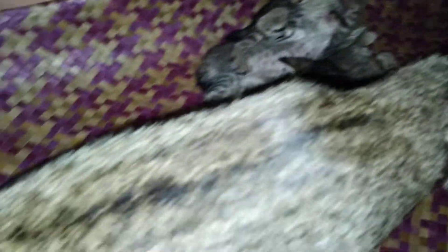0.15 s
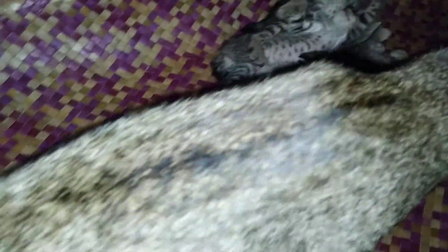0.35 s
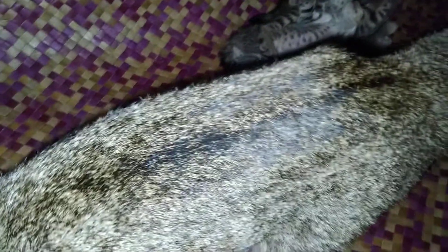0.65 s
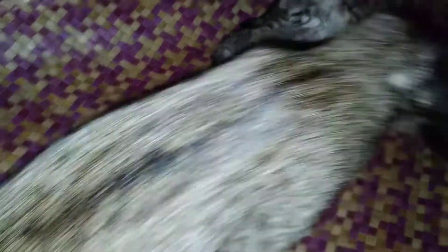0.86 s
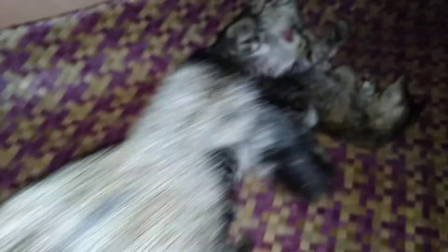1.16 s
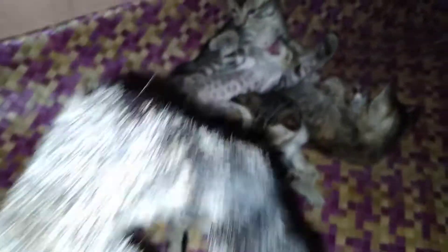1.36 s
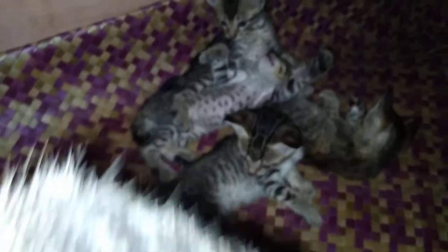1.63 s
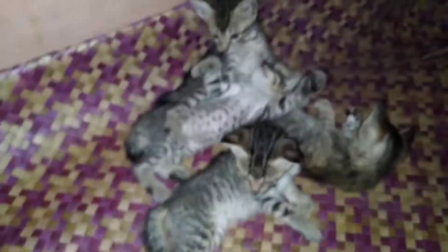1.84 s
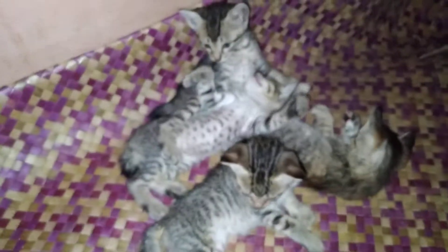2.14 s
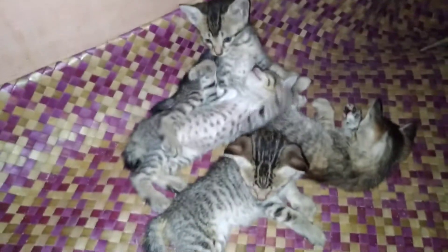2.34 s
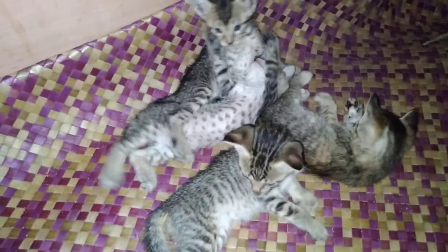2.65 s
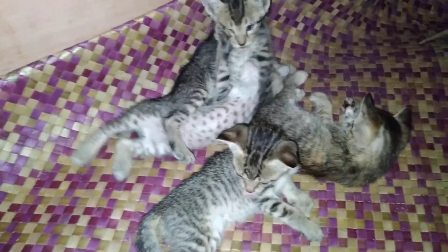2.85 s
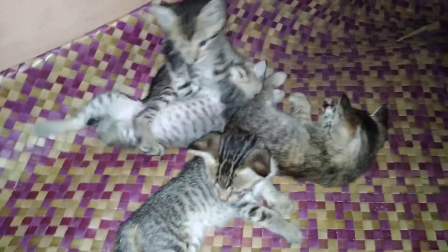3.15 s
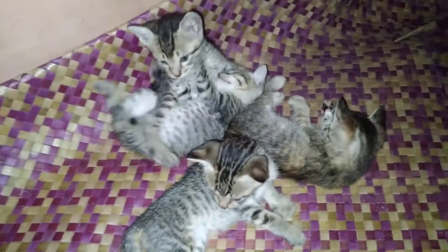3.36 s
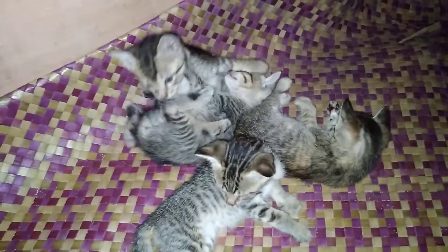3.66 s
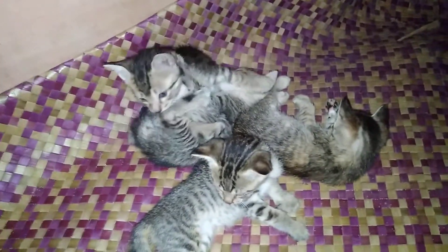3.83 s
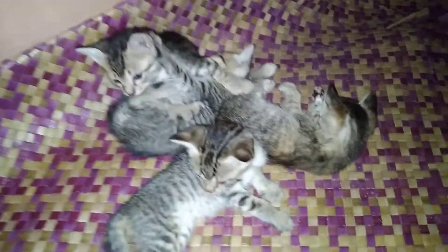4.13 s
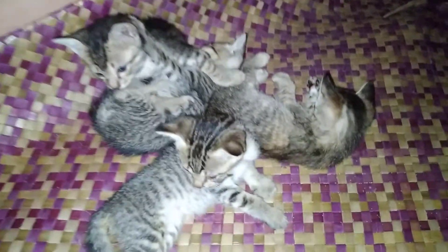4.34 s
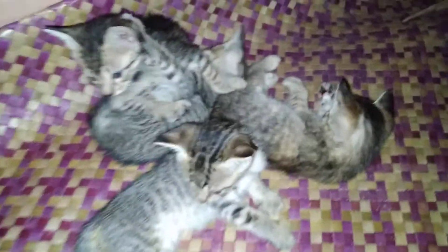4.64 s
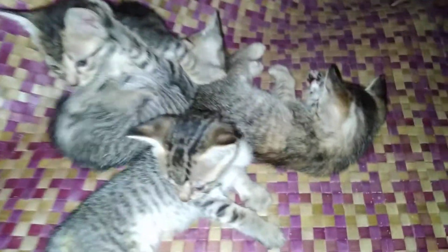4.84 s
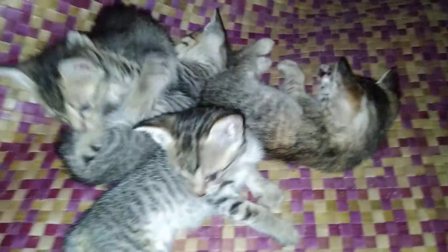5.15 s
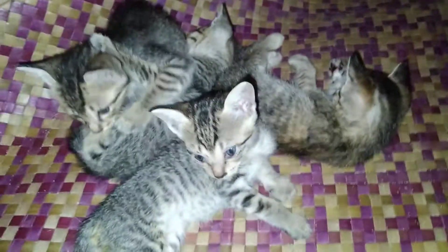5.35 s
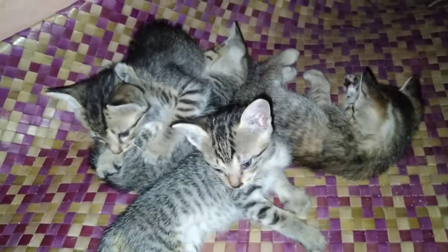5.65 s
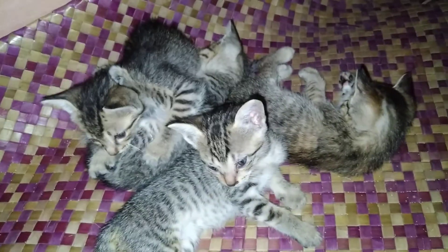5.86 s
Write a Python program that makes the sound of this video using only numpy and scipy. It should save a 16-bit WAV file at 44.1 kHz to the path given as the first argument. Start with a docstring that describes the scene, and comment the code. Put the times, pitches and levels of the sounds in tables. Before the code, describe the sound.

Kittens rustle and pat on a woven mat; a phone buzzes twice, a hoarse rooster-like crow sounds farther off, then sharp knocks hit the microphone.

```python
"""Kittens on a woven mat

Kittens tumble in a small room: enveloped noise makes swishes and fur rubs, damped sines make soft bumps,
and short pulses make claw ticks and knocks at the microphone. A phone's vibration motor spins up and
coasts down twice, a modelled shaft turning in a rough bearing. Short noise rasps come at a near even pace.
Further off, harmonics and chopped noise give a hoarse four-note call, like a rooster's crow, that clears
as it falls."""
import sys
import numpy as np
from scipy import signal
from scipy.fft import rfft, irfft
from scipy.io import wavfile
from scipy.ndimage import uniform_filter1d, map_coordinates

SR = 44100
rng = np.random.default_rng(int(sys.argv[2]) if len(sys.argv) > 2 else 0)


def log_audio(samples):
    """Write samples as a 16-bit WAV file to the path given in sys.argv[1]."""
    # one column per channel
    frames = np.atleast_2d(samples).T
    # limit to full scale, then quantise
    limited = np.clip(frames, -1, 1)
    pcm = np.round(limited * 32767).astype(np.int16)
    wavfile.write(sys.argv[1], SR, pcm)


N = 264143
T = np.arange(N) / SR  # time in seconds


def swishes(grain_db=0.9, catch_db=3):
    """Sliding friction: each slide or claw drag over the weave is a swell of finely uneven noise."""
    # Paws and bodies sliding. Each row: start in seconds, level in dB, length in seconds.
    slide_rows = [(0, -42, .029), (.03, -46.5, 0.085), (.161, -49.5, 0.066), (.298, -48.5, 0.062),
                  (.352, -55, 0.077), (.666, -43.5, 0.11), (.768, -58.5, 0.052), (.938, -61.5, 0.05),
                  (1.018, -45.5, 0.061), (2.576, -58, 0.086), (2.7, -46.5, 0.23), (2.876, -59, .2),
                  (3.095, -59, .02), (3.485, -52, .095), (3.772, -59.5, 0.092), (4.085, -53, 0.046),
                  (4.465, -63.5, 0.058), (4.493, -56, 0.069), (5.105, -61.5, 0.067), (5.135, -54, 0.043),
                  (5.273, -49, 0.19), (5.478, -43.5, .076), (5.555, -43.5, 0.087), (5.657, -48, 0.06),
                  (5.925, -53, .035)]
    # Spectrum of the slides. Each row: frequency in Hz, relative level in dB.
    slide_colour = [(1180, -23.5), (2000, -17), (2380, -24), (2960, -21.5), (3770, -19), (4490, -22),
                    (6590, -9.5), (7120, -12.5), (8480, 0.5), (9330, 0), (12400, -18), (16000, -23.5)]
    # Claws dragged across the strands. Each row: start in seconds, level in dB, length in seconds.
    scrape_rows = [(.77, -57, 0.053), (.93, -59.5, 0.12), (5.285, -48.5, 0.074), (5.46, -51, 0.096),
                   (5.555, -58.5, 0.086), (5.655, -52, 0.074)]
    # Spectrum of the claw drags. Each row: frequency in Hz, relative level in dB.
    scrape_colour = [(600, -18.5), (1600, -18), (2150, -1.5), (2700, -4), (3200, -3.5), (4000, -13.5),
                     (6000, -9.5), (9000, -7.5), (14000, -38.5)]
    slide_gain = strokes(slide_rows) * amp(grain_db * wander(500))
    slides = colour(noise(same=0.23) * slide_gain, slide_colour)
    claw_gain = strokes(scrape_rows) * amp(catch_db * wander(300))
    claws = colour(noise(same=0.34) * claw_gain, scrape_colour)
    return room(slides + claws * pan(3.0), wet_db=-5.0)


def bodies():
    """Broadband rubbing and low-frequency shaking: fur brushes by the phone, rolling bodies shake the floor."""
    # Fur brushing past the phone. Each row: start in seconds, level in dB, length in seconds.
    fur_rows = [(.66, -75, 0.13), (.81, -59, 0.14), (.93, -65, 0.51), (1.03, -53.5, 0.048),
                (1.085, -48, 0.073), (5.325, -41, 0.08), (5.39, -58, 0.13), (5.52, -65, 0.25),
                (5.65, -65.5, 0.2), (5.82, -70.5, 0.22)]
    # Spectrum of the fur. Each row: frequency in Hz, relative level in dB.
    fur_colour = [(100, -18), (300, -1.5), (560, -4.5), (900, -6), (1300, -3.5), (2300, -14.5),
                  (3400, -11.5), (4500, -21), (9000, -18.5), (14000, -40)]
    # Bodies rolling on the floor. Each row: start in seconds, level in dB, length in seconds.
    tumble_rows = [(.39, -65, 0.13), (1.015, -44.5, .075), (1.09, -59, 0.14), (2.33, -56.5, 0.4),
                   (2.6, -55, 0.077), (2.94, -55, 0.14), (3.12, -56.5, 0.36), (3.37, -50, 0.16),
                   (4.11, -61.5, 0.1), (4.78, -55, 0.25), (4.96, -77, .07), (5.32, -60, 0.12),
                   (5.76, -60, .13)]
    # Spectrum of the shaking floor. Each row: frequency in Hz, relative level in dB.
    tumble_colour = [(20, -37.5), (36, -9.5), (52, 3), (100, -0.5), (135, -11.5), (190, -7.5), (280, -29),
                     (600, -48)]
    # restless stirring lies under the rolls: level, unevenness and pace
    stir_db, stir_swing_db, stir_hz = -71, 4, 3.3
    fur_gain = strokes(fur_rows) * amp(2 * wander(55))
    fur = colour(noise(same=0.39) * fur_gain, fur_colour) * pan(4.2)
    shaking = strokes(tumble_rows) + amp(stir_db + stir_swing_db * wander(stir_hz))
    floor = colour(noise(same=0.97), tumble_colour) * shaking
    return ports(fur + floor)


def pats():
    """Damped oscillation: the mat gives a few swings under each paw, and toes tap faintly at random."""
    # Paws patting, dull with the pad and brighter with the toes.
    # Each row: start in seconds, envelope peak in dB, swing frequency in Hz.
    pat_rows = [(0.525, -53.5, 291), (.593, -54, 1340), (.633, -49.5, 1490), (.674, -52.5, 288),
                (.748, -54.5, 595), (.826, -47, 630), (1.055, -50.5, 202), (1.106, -48, 510),
                (2.334, -38, 95.5), (2.419, -42.5, 89.4), (3.9, -41.5, 1280), (3.921, -62, 1290),
                (3.95, -55, 1564), (4.169, -53, 610), (4.476, -51.5, 1650), (4.531, -60, 1540),
                (4.653, -56, 1810), (4.682, -57, 1720), (4.796, -43, 119.2), (4.889, -54, 116),
                (5.112, -48, 1590), (5.414, -54, 473), (5.484, -51, 640), (5.562, -52.5, 337),
                (5.668, -48, 635), (5.846, -48.5, 660), (5.86, -48, 193), (5.947, -47.5, 285)]
    peak_swings = 1.19  # swings of the mat up to the peak of a pat
    toes_per_s, toe_db, toe_hz, toe_spread_db = 9.2, -62, 1642, -2
    toes = []
    for s in T[rng.random(N) < toes_per_s / SR]:
        level = toe_db + toe_spread_db * rng.standard_normal()
        toes.append((s, level, toe_hz * rng.uniform(0.52, 1.15)))
    out = np.zeros(N)
    for s, db, hz in list(pat_rows) + toes:
        part = out[round(s * SR):][:SR // 4]  # a view: adding to it adds to out
        swings = hz * T[:len(part)]
        envelope = swings / peak_swings * np.exp(1 - swings / peak_swings)
        part += amp(db) * envelope * np.sin(2 * np.pi * swings)
    return room(out * pan(0), wet_db=-1.5)


def knocks():
    """Pressure pulse: a push and a pull at the nearer port; a slower push is also rounder."""
    # Knocks right at a microphone port.
    # Each row: time in seconds, level in dB, width in seconds, left minus right in dB.
    knock_rows = [(4.1682, -31, 0.00025, -31), (4.8821, -7.5, 0.000025, 55), (5.341, -5, 0.00016, 45),
                  (5.3621, -14, 0.00025, 43), (5.3639, -12.5, 0.000084, 41), (5.3668, -17, 0.00015, 34)]
    out = np.zeros((2, N))
    for s, db, width, side_db in knock_rows:
        u = (T - s) / width
        sides = pan(side_db) / pan(abs(side_db))[0]  # the louder port has gain 1
        out += amp(db) * sides * -u * np.exp(1 - np.hypot(u, .4))
    return out


def ticks():
    """Elastic release: a strand caught by a claw snaps back with a very short decaying crackle."""
    # Claws catching on strands.
    # Each row: time in seconds, level in dB, decay time in seconds, left minus right in dB.
    tick_rows = [(2.8323, -30.5, 0.0012, -10), (4.092, -47.5, 0.00058, -6), (4.3084, -52.5, 0.00075, 13),
                 (4.8766, -32, 0.0007, -3.5), (4.8837, -20.5, 0.00017, -10), (4.8862, -17, 0.00036, -1),
                 (5.3401, -17.5, 0.00053, 13.5), (5.3582, -41, .0007, 8), (5.3592, -34.5, 0.0074, 19),
                 (5.374, -31, 0.00055, 17), (5.5468, -31, 0.00033, 9), (5.6134, -21.5, 0.0007, 4.5)]
    # Spectrum of the crackle. Each row: frequency in Hz, relative level in dB.
    tick_colour = [(300, -6.5), (1000, -8.5), (3500, -10), (5500, -7.5), (7300, -1), (8800, 6), (10500, 0),
                   (13000, -10), (16000, -10.5)]
    gain = np.zeros((2, N))
    for s, db, decay, side_db in tick_rows:
        gain += amp(db) * pan(side_db) * (T >= s) * np.exp(-abs(T - s) / decay)
    return room(colour(np.sign(noise()) * gain, tick_colour), wet_db=-13.5)


def motor(hiss_db=-10, repeat_driven=1.0, repeat_coasting=0.52, hum_db=-4, port_lag=2.56, rib_db=3.0):
    """Rotating imbalance: an off-centre weight hums; its shaft scrapes the bearing, mostly in the left port."""
    # Hum of the weight. Each row: shaft speed in Hz, relative level in dB.
    hum_levels = [(30, -80), (75, -51), (100, -40.5), (125, -34), (165, -33), (240, -31)]
    # Bumps felt in each turn. Each row: multiple of the shaft speed, relative level in dB.
    bump_levels = [(2, -10), (3, 5), (4, 7), (5, 9.5), (6, -11), (8, 2.5), (10, -8), (12, 7), (13, -2),
                   (18, -8), (19, -6.5), (24, 4.5), (29, -9), (38, 1), (52, -4.5), (64, -3.5), (79, -0.5)]
    # Spectrum of the rattle. Each row: frequency in Hz, relative level in dB.
    rattle_colour = [(300, -40.5), (700, -47), (1200, -19.5), (3300, -17.5), (5500, -10.5), (7300, -15.5),
                     (8100, -8), (8800, 1.5), (9500, -6), (10400, -18), (12800, -28), (15500, -22)]
    speed, driven, force = shaft()
    turns = np.cumsum(speed * (1 + 0.0011 * wander(66))) / SR
    # the case rocks, so its two ends move almost in opposition (port_lag in radians)
    swing = np.sqrt(2) * np.sin(2 * np.pi * turns - [[0], [port_lag]])
    hum = swing * amp(read(hum_levels, speed) + wander(96)) * (speed > 0)
    # the bearing's roughness lies along the angle, so its whole pattern glides with the speed
    steps, laps = 512, 256  # points in a turn, turns in the pattern
    order = np.arange(steps * laps // 2 + 1) / laps
    phases = np.exp(2j * np.pi * rng.random(len(order)))
    bumps = amp(read(bump_levels, order)) * (order > 1) * (order < 80) * phases
    # some multiples stand out from their neighbours as fine ribs
    bumps *= amp(rib_db * rng.standard_normal(steps)[np.round(order).astype(int)])
    place = turns * steps % (steps * laps)
    exact = map_coordinates(unit(irfft(bumps * (order % 1 == 0))), [place], order=1)
    loose = map_coordinates(unit(irfft(bumps)), [place], order=1)
    # a fast, driven shaft repeats each turn; a slow or coasting one plays loosely in its bearing
    pace = speed / speed.max()
    repeat = np.clip(np.sqrt(pace) * np.where(driven > 0, repeat_driven, repeat_coasting), 0, 1)
    scrape = (np.sqrt(repeat) * exact + np.sqrt(1 - repeat) * loose) * pace
    # the brushes add a bright hiss; at speed the weight presses the shaft home once a turn
    hiss = amp(hiss_db) * np.diff(noise(), prepend=0)
    press = 1 + .5 * pace ** 2 * np.cos(2 * np.pi * turns)
    rattle = colour((scrape + hiss) * press, rattle_colour)
    # an even local power leaves the level to the shaft's force
    rattle /= np.sqrt(uniform_filter1d(rattle ** 2, size=1500) + 1e-9)
    return hum * pan(7.7) * amp(hum_db) + rattle * force * pan(25.23)


def shaft(spin_up=.111, coast=.17, friction_hz=40):
    """Rotational inertia: speed, power and rattle gain as power spins the shaft up and friction stops it."""
    # Each row: power on in seconds, power off in seconds, free-running speed in Hz,
    # relative rattle level in dB at the greatest speed reached.
    buzz_rows = [(1.218, 1.463, 260.7, -36.5), (1.713, 1.962, 267.4, -35.5)]
    brush_db, brush_rise_s = -42.5, .018  # the brushes chatter while they pull the shaft up to speed
    speed, driven, power = np.zeros((3, N))
    for on, off, top_hz, db in buzz_rows:
        rise = top_hz * (1 - np.exp(-np.clip(T - on, 0, off - on) / spin_up))
        slowing = np.exp(-np.maximum(T - off, 0) / coast)
        hz = np.maximum((rise + friction_hz) * slowing - friction_hz, 0)
        pace = hz / hz.max()
        powered = gate(on - brush_rise_s / 2, off - on, brush_rise_s, brush_rise_s) ** 2
        power += (amp(db) * pace) ** 2 + (amp(brush_db) * powered * (1 - pace)) ** 2
        speed, driven = np.maximum(speed, hz), driven + powered
    return speed, driven, np.sqrt(power)


def call(jitter=0.0248, rasp_hz=110, air=0.65, clean_db=-1, rough_db=1, flutter_hz=170, bright=0.41):
    """Source and filter: a high voice breaks into a rasp when the folds beat irregularly."""
    # Resonances of the animal's throat. Each row: frequency in Hz, relative level in dB.
    throat = [(250, -46.5), (560, -41.5), (690, -5), (820, 10.5), (910, -6.5), (1100, 0), (1450, 3),
              (1750, 1.5), (1920, 5.5), (2120, -3.5), (2350, 4), (2700, -4), (2950, -18.5), (3200, -11.5),
              (3500, -12), (3780, -14), (4400, -26), (6200, -25.5), (8000, -34.5)]
    # The second note cracks to about the octave below.
    # Each row: start in seconds, length in seconds, pitch in Hz, relative level in dB.
    crack_rows = [(2.541, 0.025, 425.3, -43)]
    effort, pitch, rough = phrase()
    angle = 2 * np.pi * np.cumsum(pitch * (1 + jitter * rough ** 2 * wander(102))) / SR
    clean = sum(np.cos(k * angle) / k ** 1.2 for k in range(1, 8)) * amp(1.74 * wander(25))
    rasp = sum(np.cos(k * angle) * wander(rasp_hz) for k in range(1, 5))
    # loose tissue chops the rasp into uneven pulses
    chop = 1 + .6 * np.cos(2 * np.pi * np.cumsum(flutter_hz * (1 + .3 * wander(40))) / SR)
    breath = colour(rng.standard_normal(N) * chop, throat)
    rasp = unit(colour(rasp * chop, throat)) + air * breath
    # the hardest push sharpens the sound
    curve = np.diff(np.diff(rasp, prepend=0), prepend=0)
    rasp = rasp - bright * (effort / effort.max()) ** 2 * curve
    tone = amp(clean_db) * np.sqrt(1 - rough) * unit(colour(clean, throat)) * pan(1.2)
    voice = tone + amp(rough_db) * rough * unit(rasp)
    crack = np.zeros(N)
    for s, length, hz, db in crack_rows:
        crack += strokes([(s, db, length)]) * np.sin(2 * np.pi * hz * T + 0.52 * wander(60))
    return room((voice * effort + crack) * pan(1.85), wet_db=1)


def phrase(waver_db=-0.17):
    """Breath control: effort, pitch and roughness as notes scoop up, sag and droop and the voice clears."""
    # Notes of the call. Each row: start in seconds, length in seconds, relative level in dB, change over
    # the note in dB, top pitch in Hz before any clearing, time to the top in seconds,
    # first roughness (0-1), last roughness (0-1).
    note_rows = [(2.297, .19, -40.5, -9, 854.8, 0.2, 0.58, 0.8),
                 (2.543, .1, -36.5, 2, 1010, 0.047, 0.19, 0.55),
                 (2.651, 0.43, -36, -5, 1035, .1, 0.93, 0.76),
                 (3.242, .645, -39, -8, 973.5, 0.15, 0.89, 0.4)]
    # The rasp gives way to a clearer tone. Each row: start in seconds, length in seconds,
    # level change in dB, pitch change in Hz, roughness reached (0-1).
    clearing_rows = [(2.562, .06, 3.5, 0.5, 0.21), (3.405, .18, 1, 0, 0.47), (3.575, .255, -1, -22, 0.07)]
    attack_share, release_s = 0.16, 0.076  # a note swells over this share of its length, closes quickly
    scoop, sag_hz_per_s = .14, 190  # pitch starts this share below its top, then sags as the air runs out
    droop_hz, droop_s = 121.55, .12  # and droops as the note closes
    glide_s = .025  # time a clearing takes to come or go
    catch_db, catch_s = 5.5, 0.066  # a last hoarse push as the call ends
    effort, pitch, rough = np.zeros((3, N))
    for start, length, db, fade_db, top_hz, top_s, first, last in note_rows:
        age = np.clip(T - start, 0, length)
        effort += amp(db + fade_db * age / length) * gate(start, length, attack_share * length, release_s)
        hz = top_hz * (1 - scoop * np.maximum(1 - age / top_s, 0))
        hz -= sag_hz_per_s * np.maximum(age - top_s, 0)
        hz -= droop_hz * np.maximum(1 - (length - age) / droop_s, 0) ** 2
        sounding = (T >= start) | (pitch == 0)
        pitch = np.where(sounding, hz, pitch)
        rough = np.where(sounding, first + (last - first) * age / length, rough)
    for start, length, db, hz, left in clearing_rows:
        clear = gate(start, length, glide_s, glide_s)
        effort = effort * amp(db * clear)
        pitch = pitch + hz * clear
        rough = rough + (left - rough) * clear
    end = note_rows[-1][0] + note_rows[-1][1]
    catch = gate(end - catch_s, 2 * catch_s, glide_s, release_s)
    return effort * amp(catch_db * catch + waver_db * wander(22)), pitch, np.clip(rough, 0, 1)


def rasps(rise=0.015):
    """Exponential decay: short harsh noise bursts ring briefly in the room."""
    # Each row: start in seconds, relative level in dB, decay time in seconds.
    rasp_rows = [(0.458, -34.5, 0.0097), (1.01, -32.5, 0.016), (1.557, -29.5, 0.011), (2.107, -30, 0.013),
                 (2.725, -31.5, 0.0059)]
    # Spectrum of the bursts. Each row: frequency in Hz, relative level in dB.
    rasp_colour = [(350, -43), (620, -17.5), (780, -4), (1300, -4), (1900, 0.5), (2700, 2), (3500, -3.5),
                   (5500, -14.5), (8800, -11.5), (11000, -35.5), (16000, -53)]
    gain = np.zeros(N)
    for s, db, decay in rasp_rows:
        fall = np.exp(-np.maximum(T - s - 2 * rise, 0) / decay)
        gain += amp(db) * np.clip((T - s) / rise, 0, 1) * fall
    bursts = colour(noise(same=0.74) * gain * amp(1.4 * wander(250)), rasp_colour)
    return room(bursts * pan(1.1) * amp(-5.5), wet_db=-2.5)


def hush():
    """Stationary noise: the steady hush of the room, partly shared by the two ports."""
    # Spectrum of the hush. Each row: frequency in Hz, relative level in dB.
    hush_colour = [(25, -17), (82, -1.5), (134, -4), (185, -3), (354, -12), (607, -13.5), (1000, -27.5),
                   (1700, -27.5), (2500, -34.5), (4600, -38), (7300, -28.5), (9000, -15.5), (11300, -36),
                   (16000, -29.5)]
    return amp(-69.5) * colour(noise(same=0.57), hush_colour)


def room(x, wet_db):
    """Reverberation: adds sparse reflections, each band dying at its own speed."""
    # Each row: frequency in Hz, time to fall by 60 dB in seconds.
    decay_times = [(150, 0.58), (1000, 0.14), (3000, 0.21), (9000, 0.29), (16000, 0.41)]
    taps = rng.standard_normal((2, SR // 2)) * (rng.random((2, SR // 2)) < .1)
    hz, t, z = signal.stft(taps, SR, nperseg=256)
    fall = amp(-60 * t / read(decay_times, hz)[:, None])
    tail = signal.istft(z * fall, SR, nperseg=256)[1]
    tail /= np.linalg.norm(tail, axis=1, keepdims=True)
    return ports(x) + amp(wet_db) * signal.fftconvolve(x, tail, axes=1)[:, :N]


def ports(x, lag_s=0.0003882):
    """Path difference: a linear phase delays the left channel by the path between the two ports."""
    delay = np.exp(-2j * np.pi * np.fft.rfftfreq(2 * N, 1 / SR) * lag_s)
    left = irfft(rfft(x[0], 2 * N) * delay)[:N]
    return np.array([left, x[1]])


def strokes(rows):
    """Amplitude envelope: each stroke of (start s, level dB, length s) swells quickly and fades."""
    return sum(amp(db) * np.sin(np.pi * np.clip((T - s) / length, 0, 1) ** 0.55) for s, db, length in rows)


def gate(start, length, attack, release):
    """Linear envelope: attack, hold and release, from 0 to 1 and back."""
    return np.clip((T - start) / attack, 0, 1) * np.clip((start + length - T) / release, 0, 1)


def colour(x, points):
    """Minimum-phase filtering: a causal filter of the given spectrum keeps the power of white noise."""
    log_gain = np.log(amp(read(points, abs(np.fft.fftfreq(4096, 1 / SR)))))
    taps = np.fft.ifft(np.exp(np.conj(signal.hilbert(log_gain)))).real
    return signal.oaconvolve(np.atleast_2d(x), taps[None] / np.linalg.norm(taps), axes=1)[:, :N]


def noise(same=0):
    """Partial coherence: white noise for two ports that share a part of their power."""
    same = np.clip(same, 0, 1)
    return np.sqrt(1 - same) * rng.standard_normal((2, N)) + np.sqrt(same) * rng.standard_normal(N)


def wander(hz):
    """Low-passed noise: smooth random motion up to about hz, at rms 1."""
    low_pass = 1 + (np.fft.rfftfreq(N + 1, 1 / SR) / hz) ** 4
    return unit(irfft(rfft(rng.standard_normal(N + 1)) / low_pass)[:N])


def pan(db):
    """Level difference between ears: left and right gains, positive to the left."""
    return amp(np.array([[db], [-db]]) / 2)


def read(points, hz):
    """Logarithmic frequency scale: interpolates a table along it."""
    f, value = np.transpose(points)
    return np.interp(np.log(hz + 1), np.log(f + 1), value)


def unit(x):
    """Root-mean-square level: scales to rms 1."""
    return x / np.sqrt(np.mean(x ** 2) + 1e-20)


def amp(db):
    """Decibel scale: level to amplitude gain."""
    return 10 ** (np.asarray(db) / 20)


def scene():
    """Superposition: all sources add over the hush of the room."""
    kittens = swishes() + bodies() + pats() + knocks() + ticks()
    return kittens + motor() + call() + rasps() + hush()


def record(dry):
    """Band limiting: a linear-phase low-pass at 16.2 kHz."""
    taps = signal.firwin(511, 16200, window=("kaiser", 9), fs=SR)
    return signal.oaconvolve(dry, taps[None], "same")


dry = scene()
out = record(dry)
log_audio(out)
```